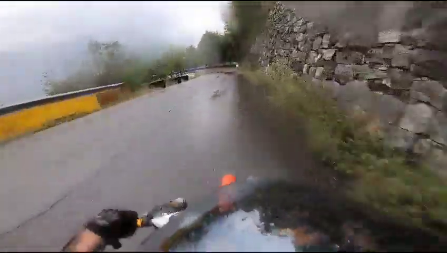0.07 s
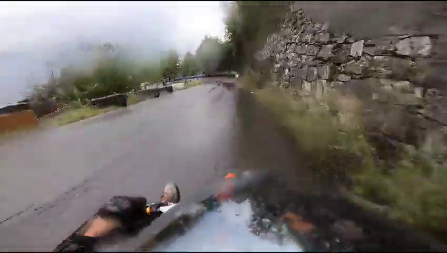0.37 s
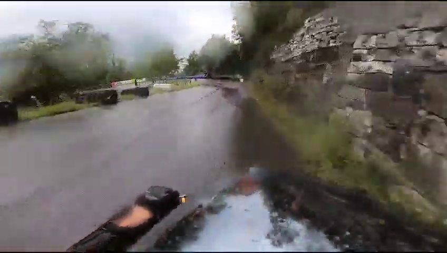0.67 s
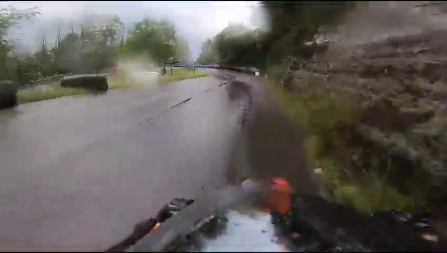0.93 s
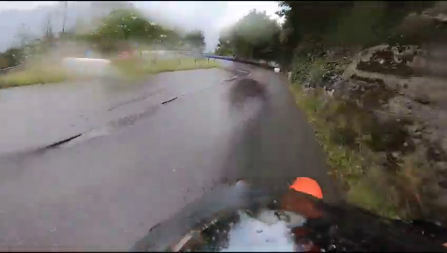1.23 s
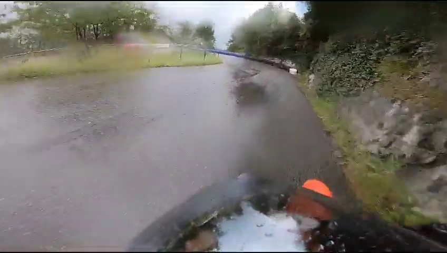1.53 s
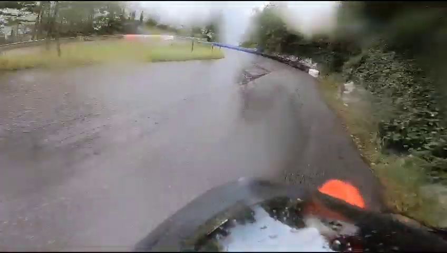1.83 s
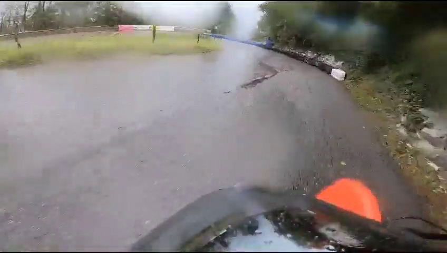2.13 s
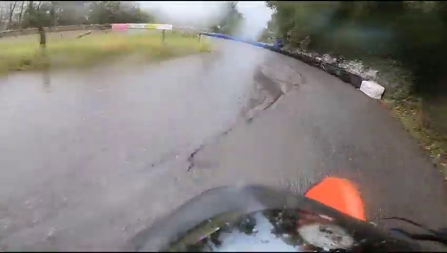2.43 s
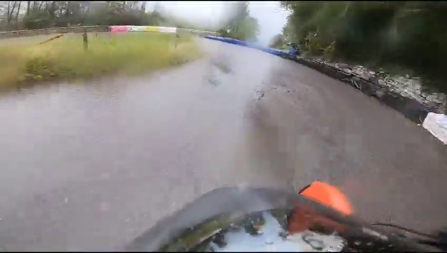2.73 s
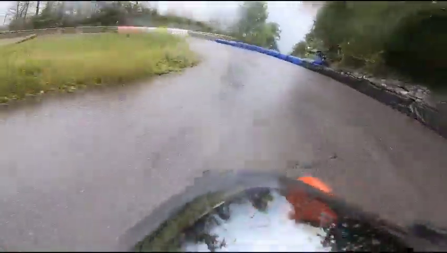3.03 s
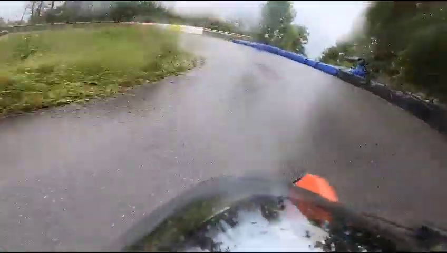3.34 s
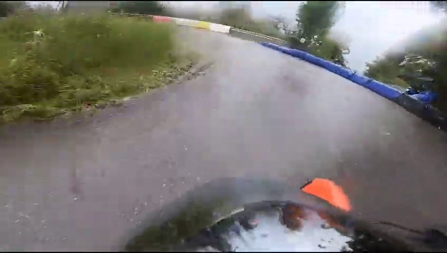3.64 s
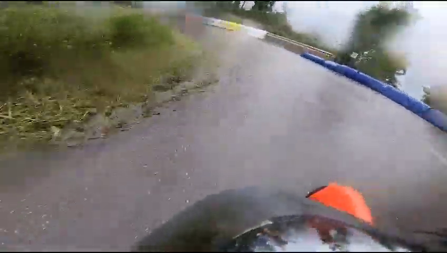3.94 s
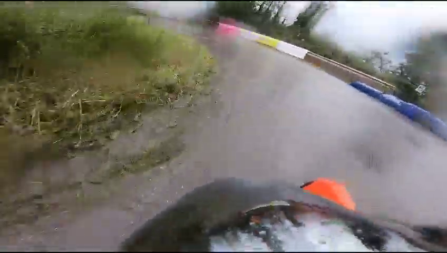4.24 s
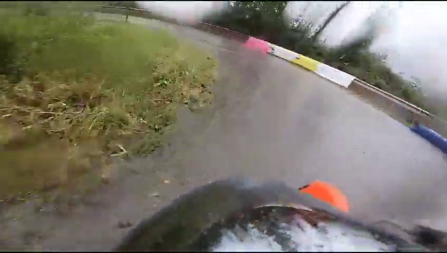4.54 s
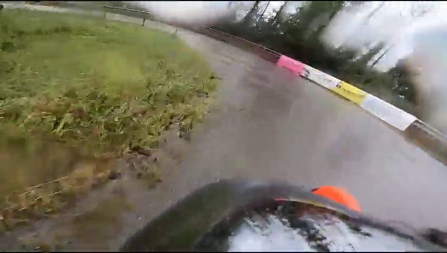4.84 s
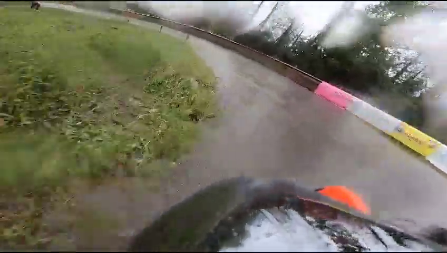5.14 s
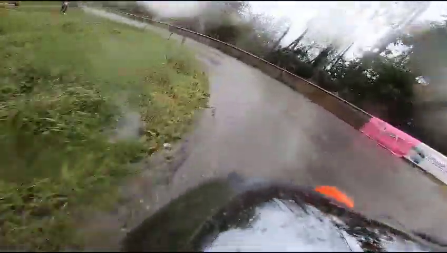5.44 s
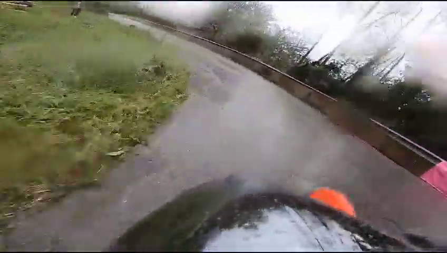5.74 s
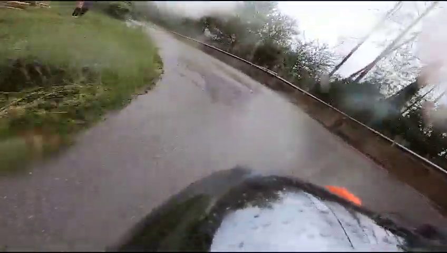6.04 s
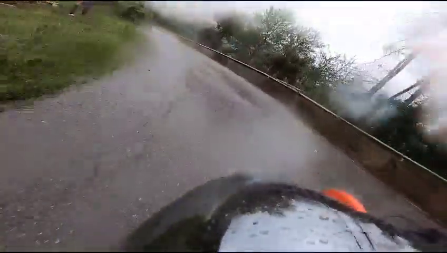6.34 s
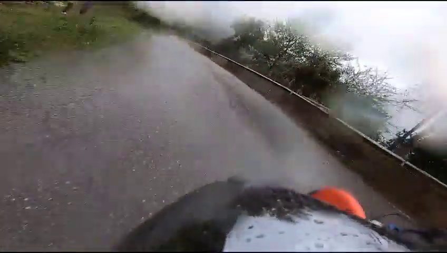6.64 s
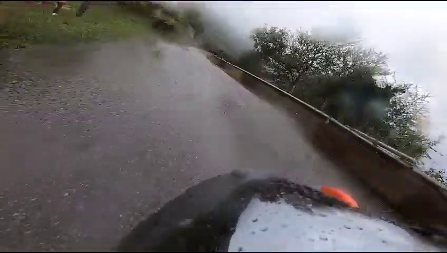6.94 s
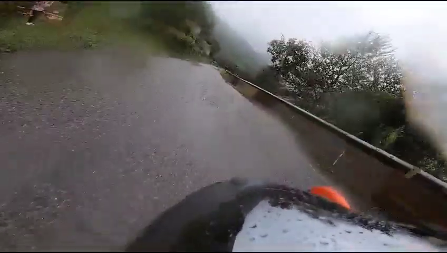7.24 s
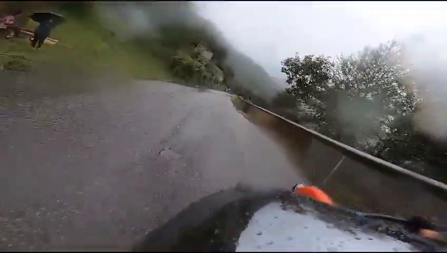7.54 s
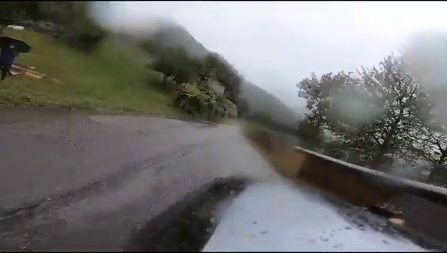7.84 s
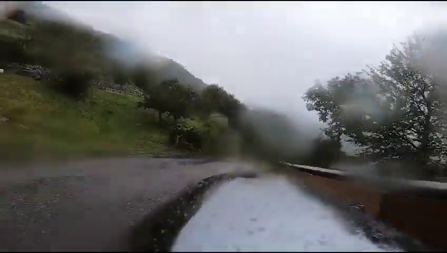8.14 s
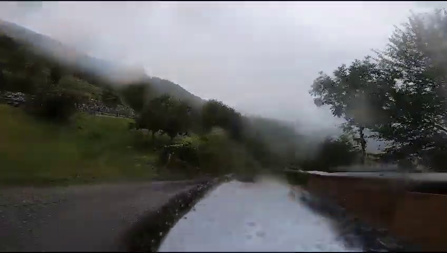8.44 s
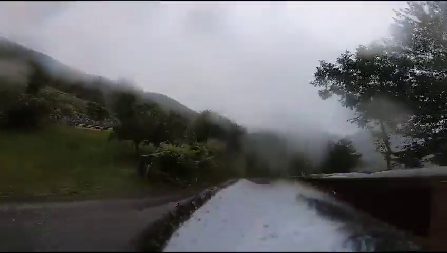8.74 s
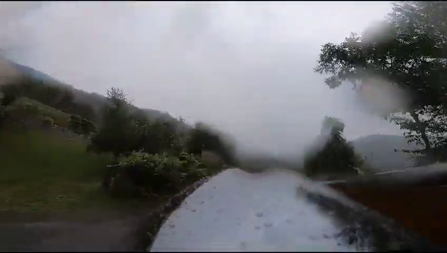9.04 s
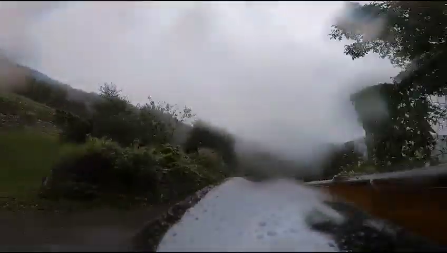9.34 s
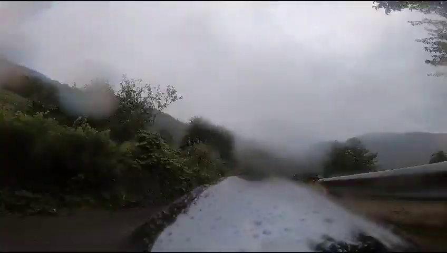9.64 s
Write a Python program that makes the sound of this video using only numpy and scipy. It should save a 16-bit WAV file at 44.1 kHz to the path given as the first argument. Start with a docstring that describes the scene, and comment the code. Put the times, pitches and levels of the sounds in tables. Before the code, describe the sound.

Wind rumbles on a microphone riding on a drift trike, then gives way to the hollow, throbbing drone of plastic wheels skidding over wet asphalt. Water splashes and hisses at each bump, with scattered droplet ticks and dull knocks. Later, gravel rattles and a few stones clack against the frame as the gusts build again, ending with a wavering wheel whine.

```python
"""Drift trike on wet asphalt

Heard close up, from a camera on the rider, through one bend. Hollow plastic rear wheels drum, groan and
scrub on the road, throw spray at every bump and whine on the way out. Wind buffets the microphone on
the straights and dies down in the slow bend. Grit knocks on the trike, and drops tick on the camera,
whose wet port dulls the treble of splash and air hiss."""
import sys
import numpy as np
from scipy import signal
from scipy.fft import rfft, irfft, next_fast_len
from scipy.io import wavfile
from scipy.ndimage import uniform_filter1d, minimum_filter1d

SR = 44100
rng = np.random.default_rng(int(sys.argv[2]) if len(sys.argv) > 2 else 0)


def put_to_file(sound):
    """Save the sound as 16-bit audio at rate SR, in the file named by the first command-line argument."""
    columns = np.atleast_2d(sound).T  # one column per channel
    safe = np.clip(columns, -1, 1)
    whole_steps = np.round(safe * 32767)
    wavfile.write(sys.argv[1], SR, whole_steps.astype(np.int16))


N = 427329
T = np.arange(N) / SR
FREQS = np.fft.rfftfreq(N, 1 / SR)


def amp(db):
    """Decibels to gain."""
    return 10 ** (np.asarray(db) / 20)


def unit(x):
    """Scales x to rms 1."""
    return x / np.sqrt(np.mean(x ** 2) + 1e-20)


def unit_in(x, band):
    """Scales x to rms 1 within a named band."""
    lo_hz, hi_hz = {"bass": (20, 190), "drum": (240, 450), "mid": (700, 2000),
                    "high": (2500, 5000), "top": (5800, 9000)}[band]
    return x / np.std(irfft(rfft(x) * (FREQS > lo_hz) * (FREQS < hi_hz), N))


def curve(rows, t=T):
    """Every column of a table, joined by straight lines in time."""
    times, *columns = np.transpose(rows)
    return [np.interp(t, times, column) for column in columns]


def swell(s, length_s):
    """A smooth hump of height 1 around time s, length_s wide at half height."""
    return np.exp2(-np.minimum((2 * (T - s) / length_s) ** 2, 60))


def swells(rows, length_s):
    """One hump for each row of time and height."""
    return sum(height * swell(s, length_s) for s, height in rows)


def wander(lo_hz, hi_hz):
    """Random motion of rms 1 between two rates."""
    spectrum = rfft(rng.standard_normal(N))
    return unit(irfft(spectrum * FREQS / (FREQS + lo_hz) / (1 + (FREQS / hi_hz) ** 2), N))


def colour(x, spectrum):
    """Filters x by rows of frequency and level."""
    hz, db = np.transpose(spectrum)
    return irfft(rfft(x) * amp(np.interp(np.log(FREQS + 1), np.log(hz), db)), N)


def grit(per_s, spread_db, share):
    """Smooth hiss with tiny impacts of unequal size, which carry the given share of the power."""
    size = amp(spread_db * np.minimum(rng.exponential(1, N), 4))
    impacts = size * rng.choice([-1, 1], N) * (rng.random(N) < per_s / SR)
    return np.sqrt(share) * unit(impacts) + np.sqrt(1 - share) * rng.standard_normal(N)


def resonance(hz, width_hz, drive=None):
    """A narrow band set ringing by noise or by a given drive, at rms 1."""
    drive = rng.standard_normal(N) if drive is None else drive
    return unit(irfft(rfft(drive) / (1 + (2 * (FREQS - hz) / width_hz) ** 2) ** 0.93, N))


def gliding(pitch_hz, width_hz, drive=None):
    """A narrow band whose centre follows a pitch curve."""
    drift = np.exp(2j * np.pi * np.cumsum(pitch_hz - pitch_hz.mean()) / SR)
    band = signal.hilbert(resonance(pitch_hz.mean(), width_hz, drive), next_fast_len(N))[:N]
    return (band * drift).real


def burst(s, db, centre_hz, octaves, decay_s):
    """A snap and a quickly dying puff in their own band, at time s."""
    size, lead = 2048, 128  # samples
    t, hz = T[:size], np.fft.rfftfreq(size, 1 / SR) + 1
    band = np.exp(-.5 * (np.log2(hz / centre_hz) / octaves) ** 2) / (1 + (hz / 6000) ** 6)
    snap = 5.4 * (t == 0)
    puff = rng.standard_normal(size) * np.exp(-t / decay_s)
    tick = irfft(rfft(np.roll(snap + puff, lead)) * band)
    out, at = np.zeros(N + size), min(round(s * SR) - lead, N)
    out[at:at + size] = amp(db) * tick / np.abs(tick).max()
    return out[:N]


def struck(s, db, modes, contact_s=.0003):
    """A blow at time s sets a table of modes ringing."""
    out, at = np.zeros(N), round(s * SR)
    t = T[:min(4096, N - at)]
    contact = 1 - np.exp(-(t / contact_s) ** 2)
    ring = sum(amp(db + mode_db - 60 * t / t60) * np.sin(2 * np.pi * (hz * t + rng.random()))
               for hz, mode_db, t60 in modes)
    out[at:at + len(t)] = contact * ring
    return out


# Spectrum of wind right on the microphone: f/Hz, level/dB
EDDY_SPECTRUM = [(8, -5.5), (22, -7.5), (50, 1), (85, -1), (125, -3), (170, -7.5), (240, -12.5),
                 (400, -33.5), (700, -45.5), (2000, -86.5)]
def wind_eddies():
    """Eddies at the microphone make a lumpy pressure wave."""
    rumble = colour(rng.standard_normal(N), EDDY_SPECTRUM)
    return unit_in(rumble * amp(0.58 * wander(2, 8.3)), "bass")


# Wind on the microphone, strong on the straights and weak in the bend: t/s, level/dB
WIND_LEVEL = [(0.0, -16), (0.6, -15), (0.95, -22.5), (1.05, -13.5), (1.5, -20.5), (1.9, -23.5),
              (2.4, -23.5), (2.8, -29), (4.8, -37.5), (6.3, -29.5), (6.42, -21.5), (7.4, -20.5), (8.4, -20),
              (8.55, -15), (9.69, -19.5)]
# Short gusts: t/s, lift/dB
WIND_GUSTS = [(2.27, 4), (2.92, 1.5), (4.33, 9), (5.47, 9), (7.46, 10)]
# The wind lets go for a moment: t/s, depth/dB
WIND_LULLS = [(1.93, 11), (7.00, 9), (7.68, 6), (8.40, 16), (9.47, 6)]
def buffeting(eddies):
    """The eddies rumble with the airspeed, rise in each gust and drop out in each lull."""
    gusts_db = swells(WIND_GUSTS, length_s=0.045)
    lulls_db = swells(WIND_LULLS, length_s=0.071)
    return eddies * amp(curve(WIND_LEVEL)[0] + gusts_db - lulls_db)


# A film of water shifts and damps the microphone port's resonance: t/s, f/Hz, boost/dB
PORT_RESONANCE = [(0, 4630, 6.5), (.33, 4720, 0), (.43, 4830, 18), (.6, 4990, 8), (.9, 5130, 3),
                  (1.4, 4800, 11.5), (2.2, 4810, 5), (4, 5080, 1.5), (8.5, 4850, 5), (8.9, 4380, 7),
                  (9.3, 4070, 3), (9.55, 4890, 0)]
def wet_port(x, width_hz=280, order=14):
    """The port rings near its resonance and shuts off steeply above it."""
    hz, t, frames = signal.stft(x, SR, nperseg=512)
    port_hz, boost_db = curve(PORT_RESONANCE, t)
    hz = hz[:, None]
    peak = amp(boost_db / (1 + ((hz - port_hz) / width_hz) ** 2))
    lowpass = 1 / np.sqrt(1 + (hz / port_hz / 0.97) ** (2 * order))
    return signal.istft(frames * peak * lowpass, SR, nperseg=512)[1][:N]


# Hard blasts of air across the port: start/s, end/s, level/dB
AIR_BLASTS = [(-0.02, 0.322, -26.5), (.305, 0.41, -25.5)]
def blasts(attack_s=0.021, release_s=0.07):
    """Each blast hisses through the wet port, coloured like the splash, and breaks off."""
    hiss = colour(grit(per_s=1000, spread_db=2.2, share=0.45), SPLASH_SPECTRUM)
    envelope = sum(amp(db) * np.clip(np.minimum((T - start) / attack_s, (end - T) / release_s), 0, 1)
                   for start, end, db in AIR_BLASTS)
    return unit_in(wet_port(hiss), "high") * envelope


# Whistle at the port: t/s, f/Hz, level/dB
PORT_WHISTLE = [(.33, 4510, -76), (.41, 4660, -44), (.55, 4740, -53), (.72, 5000, -48), (.85, 5030, -85)]
def whistle():
    """Air whistles thinly at the wet port, rising in pitch as the blasts die away."""
    pitch_hz, db = curve(PORT_WHISTLE)
    return gliding(pitch_hz, width_hz=130) * amp(db)


# Pops right at the port: t/s, peak level/dB, centre f/Hz
PORT_POPS = [(0.543, -10, 950), (0.547, -12, 900), (.580, -14, 950), (.640, -12, 1100), (0.723, -15, 900),
             (0.8, -12, 1000), (.9985, -7, 700), (1.0132, -5.5, 650), (1.052, -7.5, 950), (1.1, -9, 750),
             (1.169, -8.5, 750), (1.1745, -14, 850), (1.204, -9, 800), (1.2483, -6.5, 850),
             (1.2995, -10, 1600), (1.3246, -10, 1250)]
def air_pops():
    """Gusting air pops dryly at the port."""
    return sum(burst(*row, octaves=.8, decay_s=.0017) for row in PORT_POPS)


# Drops landing beside the microphone: t/s, peak level/dB, centre f/Hz, width/octaves
CAMERA_DROPS = [(.583, -35, 7000, .5), (.718, -27, 7000, 0.5), (.871, -27, 6800, 0.5),
                (1.803, -32, 6000, 0.55), (3.018, -32, 7000, .6), (1.067, -9, 4240, .1),
                (1.2465, -21, 4320, .14), (3.188, -15, 3300, 1.15), (3.446, -32, 5000, .5),
                (3.70, -34, 5500, .5), (5.469, -37, 8500, 0.41), (5.755, -33, 5500, .5),
                (6.887, -26, 4960, 0.61), (7.351, -32, 5500, 0.66), (7.767, -44, 6000, .5),
                (8.578, -28, 5500, .6), (8.859, -32, 5500, 0.53), (9.128, -30, 5500, .5),
                (9.491, -26, 6000, 0.6), (9.536, -23, 4380, 0.3), (9.682, -22, 5600, .3)]
def drops():
    """Each drop hits the camera with a bright tick."""
    return sum(burst(*row, decay_s=0.0015) for row in CAMERA_DROPS)


# Gravel on the frame, late in the bend: t/s, level/dB
GRAVEL_LEVEL = [(5.0, -56), (5.5, -46), (6.3, -45.5), (6.9, -52), (7.5, -49), (7.9, -70)]
def gravel_rattle():
    """Fine gravel taps the frame and rings it in one band."""
    taps = grit(per_s=45, spread_db=2, share=1)
    return resonance(hz=2950, width_hz=600, drive=taps) * amp(curve(GRAVEL_LEVEL)[0])


# Small stones hitting the frame below the rider: t/s, level/dB, f/Hz
STONE_HITS = [(6.407, -18.5, 3130), (6.4894, -22, 2870), (6.645, -15.5, 2860), (6.688, -20, 2860),
              (6.836, -26, 2970), (7.434, -27, 3000), (7.514, -30, 3500), (7.5295, -27, 2650),
              (7.652, -12, 3030)]
# Modes of the frame: multiple of the pitch, level/dB, t60/s
FRAME_RING = [(.42, -8, .006), (.92, -6, 0.01), (1, -1, 0.016), (1.12, -7, .009), (1.45, -12, .005),
              (2.15, -9, 0.0036)]
def stone_clacks():
    """Each stone scrapes the frame and rings it briefly, at a pitch set by where it lands."""
    out = np.zeros(N)
    for s, db, pitch_hz in STONE_HITS:
        modes = [(ratio * pitch_hz, mode_db, t60) for ratio, mode_db, t60 in FRAME_RING]
        out += struck(s, db, modes) + burst(s, db - 4, pitch_hz, octaves=.5, decay_s=.0025)
    return out


# Grit knocking on the trike: t/s, level/dB, centre f/Hz
GRIT_KNOCKS = [(2.103, -25, 1700), (3.308, -20, 1300), (3.363, -21, 2200), (3.699, -17, 1510),
               (3.805, -18, 1200), (4.743, -15.5, 805), (4.997, -14, 1100), (5.160, -21, 900),
               (5.841, -18, 900), (6.174, -15, 900), (6.252, -22, 900), (6.583, -20, 800),
               (6.592, -19, 3200), (6.645, -18, 1000), (6.657, -18, 1200), (7.572, -26, 900),
               (8.345, -16, 1889), (8.441, -20, 1302), (8.882, -15, 1030), (8.961, -14, 1010),
               (9.117, -16, 900), (9.127, -11.5, 1200), (9.283, -18, 1680), (9.336, -16, 1400),
               (9.456, -15, 900), (9.536, -15.5, 1320), (9.622, -14, 1400)]
# Modes of the hollow body: f/Hz, level/dB, t60/s
BODY_RING = [(560, -0.5, 0.073), (694, -0.5, 0.025), (930, -13.5, 0.027)]
def knocks():
    """Grit lands with a dull knock, and the hollow body rings under it."""
    return sum(burst(s, db, hz, octaves=0.96, decay_s=0.0043) + struck(s, db, BODY_RING)
               for s, db, hz in GRIT_KNOCKS)


def droplets(per_s=80, spread_db=5, decay_cycles=1.4, pitches=24):
    """Fine droplets patter on the camera, each with its own size and pitch; rms 1."""
    size = amp(spread_db * np.minimum(rng.exponential(1, N), 3)) * (rng.random(N) < per_s / SR)
    pitch_hz = np.geomspace(4500, 11500, pitches)[rng.integers(0, pitches, N)]
    out = np.zeros(N)
    for at in np.flatnonzero(size):
        cycles = pitch_hz[at] * T[:min(256, N - at)]
        tick = np.sin(2 * np.pi * cycles) * np.exp(-cycles / decay_cycles)
        out[at:at + len(tick)] += size[at] * tick
    return unit(out)


# How far sideways the wheels slide, for sizzle and rasp: t/s, level/dB
SIDE_SLIP = [(0, -14.5), (1.3, -6), (1.7, -11), (2.3, -6), (2.9, 1), (3.5, -4), (4.1, -6), (5.0, -7.5),
             (5.6, -5), (6.6, -2), (7.6, -1), (8.3, -16.5), (9.69, -30.5)]
# Thin sizzle down at the road: t/s, f/Hz
SIZZLE_PITCH = [(2.5, 2708), (3.2, 2795), (3.9, 2881), (5.5, 3194), (7.6, 2944)]
def sizzle():
    """Wet grit pings under a sideways wheel in one band, whose pitch wavers and drifts."""
    pitch_hz = curve(SIZZLE_PITCH)[0] * (1 + .016 * wander(2, 8))
    pings = grit(per_s=270, spread_db=3, share=0.3)
    return gliding(pitch_hz, width_hz=330, drive=pings) * amp(curve(SIDE_SLIP)[0] - 3.5)


# Water off the wheels, most on the way into the bend: t/s, splash level/dB, spray level/dB
WATER_LEVELS = [(0.0, -41.5, -55.5), (0.85, -36.5, -57.5), (1.3, -35, -55.5), (1.7, -30.5, -49.5),
                (2.3, -34.5, -56), (2.7, -39, -59), (3.75, -35, -56.5), (4.1, -42.5, -63),
                (4.75, -42.5, -62), (5.0, -39.5, -58), (5.75, -39.5, -60.0), (6.9, -39.5, -58.5),
                (8.1, -36, -57.5), (9.2, -36.5, -61.5), (9.69, -36.5, -55.5)]
# Spectrum of the coarse splash: f/Hz, level/dB
SPLASH_SPECTRUM = [(500, -15), (1300, -2), (2200, 0), (2900, -2), (3600, -3.5), (4400, -6), (6000, -10),
                   (9000, -20)]
# Spectrum of the fine spray: f/Hz, level/dB
SPRAY_SPECTRUM = [(2500, -13), (4500, 11), (5300, 7.5), (6000, 0.5), (7300, 0), (7900, -4.5), (8600, -6.5),
                  (9150, -14.5), (10200, -14.5), (11500, -26), (13000, -44.5), (14500, -62)]
def water(load_db, droplet_share=.13):
    """The wheels fling splash and fine spray in spurts that grow with their load."""
    splash_db, spray_db = curve(WATER_LEVELS)
    spurts = amp(0.69 * load_db + 1.2 * wander(3.4, 55))
    coarse = colour(grit(per_s=900, spread_db=4.6, share=0.26), SPLASH_SPECTRUM)
    splash = wet_port(unit_in(coarse, "high") + sizzle()) * spurts
    mist = np.sqrt(1 - droplet_share) * unit_in(grit(per_s=1300, spread_db=3, share=0.37), "top")
    patter = np.sqrt(droplet_share) * unit_in(droplets(), "top")
    spray = colour(mist + patter, SPRAY_SPECTRUM) * spurts
    return unit_in(splash, "high") * amp(splash_db - 1) + unit_in(spray, "top") * amp(spray_db)


# Higher modes of a sideways wheel: f/Hz, width/Hz, level/dB
RASP_BANDS = [(636, 130, 2.5), (832, 130, 1.5), (1060, 230, -5.5)]
# The rasp climbs as the slide quickens and sinks as it ends: t/s, centre f/Hz
RASP_PITCH = [(4.0, 590), (5.6, 766), (7.5, 987), (8.6, 700)]
def rasp(reach_octaves=0.7):
    """A sideways wheel rasps in whichever higher modes lie near its rate of slipping."""
    centre_hz, = curve(RASP_PITCH)
    ring = np.zeros(N)
    for hz, width, db in RASP_BANDS:
        nearness = np.exp(-(np.log2(hz / centre_hz) / reach_octaves) ** 2)
        ring += amp(db) * resonance(hz, width) * nearness
    return ring * amp(curve(SIDE_SLIP)[0])


# Roar of wheels and air, from the rider's seat: t/s, level/dB
ROAR_LEVEL = [(0.0, -22), (0.35, -21), (0.9, -33.5), (1.14, -27), (1.24, -31.5), (1.45, -35), (1.65, -28),
              (2.35, -29), (2.7, -34), (3.8, -33), (4.12, -36.5), (4.6, -29.5), (5.18, -31.5),
              (5.55, -29.0), (6.9, -31), (7.3, -28.5), (7.85, -31.5), (8.5, -24), (9.69, -28)]
# Spectrum of plastic scrubbing on the road: f/Hz, level/dB
SCRUB_SPECTRUM = [(150, -2), (300, -2), (500, 7.5), (660, 5), (740, 2), (900, 1), (1100, -6), (1500, -9),
                  (2100, -9), (3000, -26.5), (6000, -64)]
# Spectrum of wind tearing at the port: f/Hz, level/dB
TEARING_SPECTRUM = [(120, -18), (230, 10.5), (400, 10), (560, 2.5), (730, -2), (1150, 1), (1800, -5),
                    (2500, -16), (4000, -24), (6000, -63)]
# The wind's part in the mid-range roar: t/s, power share/0-1
TEARING_SHARE = [(0, 0.4), (.4, 0.48), (1.3, 1), (1.55, 0.93), (2.4, 0.3), (2.8, 0.46), (6.2, 0),
                 (8.0, 0.25), (8.7, 0.04), (9.69, 0.42)]
def roar(load_db, eddies):
    """Plastic scrubs over grit, and air crackles as it tears at the crest of each eddy."""
    road = colour(grit(per_s=1800, spread_db=4.6, share=0.43), SCRUB_SPECTRUM)
    scrub = unit_in(road, "mid") + rasp()
    scrub = unit_in(scrub * amp(0.86 * load_db), "mid")
    crests = 0.28 + np.abs(eddies) ** 0.8
    tearing = unit_in(colour(rng.standard_normal(N) * crests, TEARING_SPECTRUM), "mid")
    share, = curve(TEARING_SHARE)
    return (np.sqrt(1 - share) * scrub + np.sqrt(share) * tearing) * amp(curve(ROAR_LEVEL)[0] - 0.85)


# Wheel whine on the straight out of the bend: t/s, level/dB
WHINE_LEVEL = [(0, -81), (8.5, -64), (8.9, -30), (9.2, -31), (9.35, -26.5), (9.69, -25.5)]
# Resonances of the whine: f/Hz, width/Hz, level/dB
WHINE_BANDS = [(240, 98, -5), (610, 130, -0.5), (1340, 150, -12.5), (1580, 62, -9), (1800, 130, -10.5),
               (2160, 70, -16.5)]
def whine(pitch_waver=.008):
    """Running straight and fast, the wheels sing in a few narrow resonances that waver together."""
    song = sum(amp(db) * resonance(hz, width) for hz, width, db in WHINE_BANDS)
    wavering_s = T + np.cumsum(pitch_waver * wander(1.8, 5)) / SR
    return np.interp(wavering_s % T[-1], T, song) * amp(curve(WHINE_LEVEL)[0])


# Groans of the sliding wheels: start/s, length/s, first f/Hz, last f/Hz, share of the drumming/0-1
STICK_SLIP = [(-0.2, 1.97, 398.8, 389, 0.55), (1.771, 0.37, 398, 334.7, 0.44),
              (2.209, 0.19, 272.7, 277, 0.33), (2.34, .11, 349, 341, 0.4), (3.878, 0.41, 348, 274.2, 0.57),
              (4.177, 0.071, 352, 343, 0.53), (4.43, 0.079, 327.5, 343, 0.65),
              (4.519, 0.24, 295.2, 280.4, 0.3), (4.69, 0.25, 258.3, 273, 0.52),
              (4.981, 0.36, 365, 401, 0.41), (7.852, 0.89, 348.6, 426, 0.32), (8.378, 0.084, 280, 280, 0.4)]
def groans(glide=0.2004, fade=0.26, octave_db=-21, shimmer_db=1.5):
    """Rough stick-slip tones swell, slip in pitch and fade; returns them and their power share."""
    jitter = 1 + .04 * wander(10, 60)
    sound, share = np.zeros(N), np.zeros(N)
    for start, length, first_hz, last_hz, top_share in STICK_SLIP:
        on = (T > start) & (T < start + length)
        progress = (T[on] - start) / length  # 0 to 1, the scale of glide and fade
        pitch_hz = first_hz + (last_hz - first_hz) * (1 + np.tanh((progress - .5) / glide)) / 2
        phase = 2 * np.pi * np.cumsum(pitch_hz * jitter[on]) / SR
        ramp = np.minimum(np.minimum(progress, 1 - progress) / fade, 1)
        power = top_share * np.sin(np.pi / 2 * ramp) ** 2
        sound[on] += np.sqrt(2 * power) * (np.sin(phase) + amp(octave_db) * np.sin(2 * phase))
        share[on] += power
    return sound * unit(amp(shimmer_db * wander(5.2, 47))), np.clip(share, 0, 1)


# Bumps and puddles press the wheels into the road: t/s, lift/dB, length/s
ROAD_BUMPS = [(1.819, 3, 0.065), (2.132, 3.5, 0.065), (2.343, 8.5, 0.045), (3.812, 6, 0.055),
              (4.616, 5.5, 0.029), (4.934, 4, 0.059), (5.041, 8, 0.027), (5.351, 9.5, 0.02),
              (5.629, 5, 0.033), (5.807, 2, 0.018), (5.974, 6.5, 0.11), (6.513, 5, .05), (6.588, 11, 0.069),
              (6.693, 12.5, 0.05), (7.518, 9.5, 0.059), (7.691, 8, 0.029), (8.004, 7.5, 0.054),
              (8.116, 3.5, 0.032), (8.215, 7.5, 0.039), (8.346, 0, 0.02), (8.724, 5, 0.036),
              (8.795, 5.5, .025), (8.987, 3.5, 0.05), (9.55, 5.5, 0.03)]
# The wheels skip and their drumming sags: t/s, depth/dB
WHEEL_SKIPS = [(1.925, 13.5), (2.205, 7), (2.885, 7), (4.415, 3), (4.97, 2.5), (5.385, 3), (5.45, 6),
               (5.93, 9.5), (6.30, 3), (6.87, 8), (8.29, 4.5), (8.38, 3), (8.76, 6.5), (9.45, 11.5)]
SKIP_S = 0.027
def wheel_load(hop_db=3, hop_lead_s=.012):
    """Load on the wheels in dB: road chatter, a press at each bump, a drop in each skip and hop."""
    deepening = 1 + .45 * np.linspace(-1, 1, N)
    chatter_db = 2 * deepening * wander(3.7, 27)
    load_db = chatter_db - 0.33 * swells(WHEEL_SKIPS, SKIP_S)
    for s, lift_db, length_s in ROAD_BUMPS:
        rebound = 0.26 * swell(s + 0.95 * length_s, length_s)  # the wheels run light after a bump
        load_db += lift_db * (swell(s, length_s) - rebound)
    hops = sum(swell(s - hop_lead_s, length_s=.02) for s, _, _ in GRIT_KNOCKS)  # just before each knock
    return load_db - hop_db * hops


# The rear wheels, close behind the rider: t/s, level/dB
DRUM_LEVEL = [(0.0, -21), (0.42, -22.5), (0.56, -28), (1.4, -25), (1.6, -19), (1.75, -18.5), (1.86, -12.5),
              (2.02, -15.5), (2.1, -18), (2.35, -16.5), (2.9, -19), (3.25, -14), (3.55, -16.5),
              (3.85, -14.5), (4.1, -11.3), (4.37, -16), (4.5, -12), (4.62, -14.5), (4.76, -10.5),
              (4.88, -13), (5.0, -14.5), (5.15, -15.5), (5.42, -19), (6.6, -16.5), (7.3, -18.5),
              (8.48, -12.5), (8.72, -18.5), (9.1, -17.5), (9.69, -43)]
# Modes of a hollow plastic wheel: f/Hz, width/Hz, level/dB
DRUM_BANDS = [(271.1, 22, 1), (308, 54, 0), (358.2, 31.6, 0), (403.4, 49.5, -2.5), (479, 48, -10.5),
              (577, 85, -17.5), (666, 52, -18.5)]
# How far the road's bite favours the upper modes: t/s, tilt/(dB per octave)
ROAD_BITE = [(0, 3.5), (1.6, 10.5), (1.88, 16.5), (2.15, 15.5), (2.45, 3.5), (3.0, -4.5), (3.3, 0.5),
             (3.62, -7), (3.82, 6), (3.98, -1), (4.4, -1), (4.74, 4), (4.97, 4), (6.0, -6), (7.5, -3.5),
             (8.25, -0.5), (8.9, -0.5), (9.69, 2)]
# The wheels grab the road and boom: t/s, lift/dB
WHEEL_GRABS = [(.385, 4), (1.075, 10.5), (3.66, 10.5), (4.06, 8), (4.21, 8), (4.49, 2), (5.075, 6),
               (5.14, 6), (5.99, 4), (8.42, 6)]
def wheel_drumming(load_db, bite_hz=510):
    """Road texture keeps the hollow wheels ringing; a harder bite favours the modes near bite_hz."""
    tilt_db, = curve(ROAD_BITE)
    ring = np.zeros(N)
    for hz, width, db in DRUM_BANDS:
        octaves_off = abs(np.log2(hz / bite_hz))
        ring += amp(db - tilt_db * octaves_off) * np.sqrt(width) * resonance(hz, width)
    ring /= np.sqrt(uniform_filter1d(ring ** 2, size=3400))  # the modes share a steady supply of energy
    groaning, share = groans()
    drumming = np.sqrt(1 - share) * unit_in(ring, "drum") + groaning
    throb_db = 1.1 * wander(3.7, 6.5) + swells(WHEEL_GRABS, length_s=0.018) - swells(WHEEL_SKIPS, SKIP_S)
    return drumming * amp(curve(DRUM_LEVEL)[0] + 0.13 * load_db + throb_db - 0.68)


def scene():
    """At the rider's one microphone, the same bumps shake drumming, scrub and spray together."""
    load_db, eddies = wheel_load(), wind_eddies()
    air = buffeting(eddies) + blasts() + whistle()
    ride = wheel_drumming(load_db) + whine() + roar(load_db, eddies) + water(load_db)
    impacts = gravel_rattle() + air_pops() + knocks() + stone_clacks() + drops()
    return (air + ride + impacts)[None]


def record(dry, ceiling=.78, fade_s=.002, edge_hz=14900):
    """The camera's limiter holds down the highest peaks; the ends fade and the top treble is cut."""
    gain = minimum_filter1d(np.minimum(1, ceiling / (np.abs(dry) + 1e-9)), size=300)
    ends = np.minimum(np.minimum(T, T[-1] - T) / fade_s, 1)
    limited = dry * uniform_filter1d(gain, size=300) * ends
    lowpass = signal.firwin(511, edge_hz, window=("kaiser", 9), fs=SR)
    return signal.oaconvolve(limited, lowpass[None], "same")


dry = scene()
out = record(dry)
put_to_file(out)
```